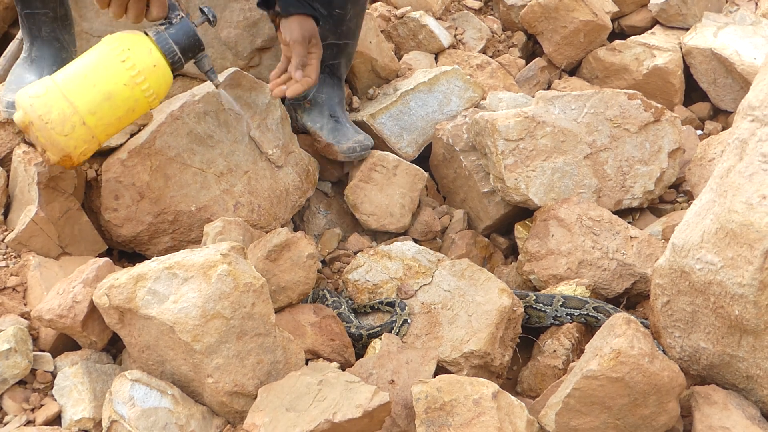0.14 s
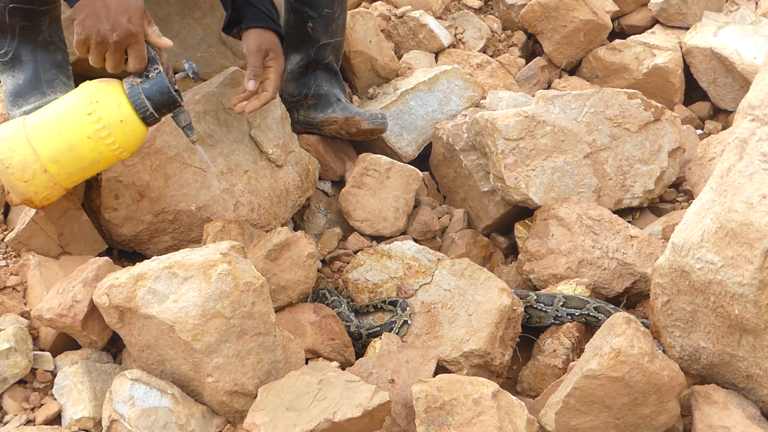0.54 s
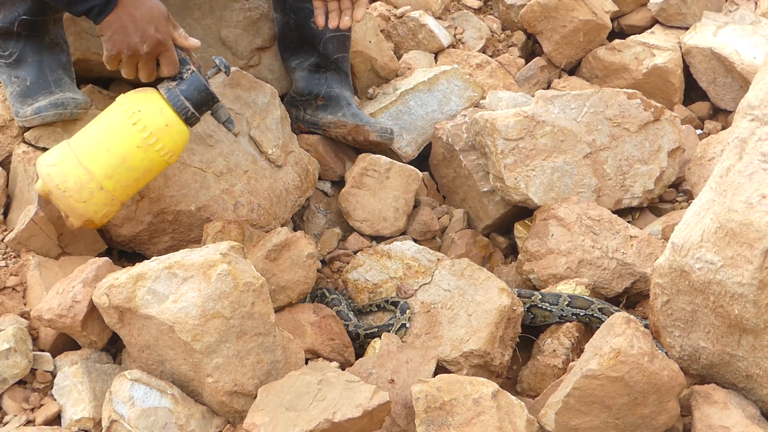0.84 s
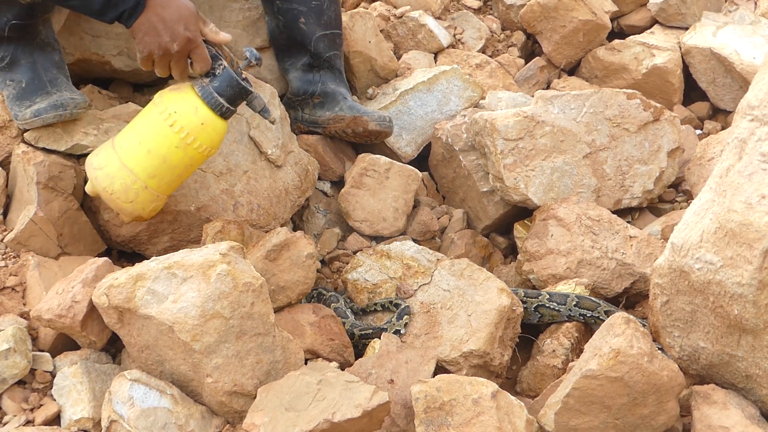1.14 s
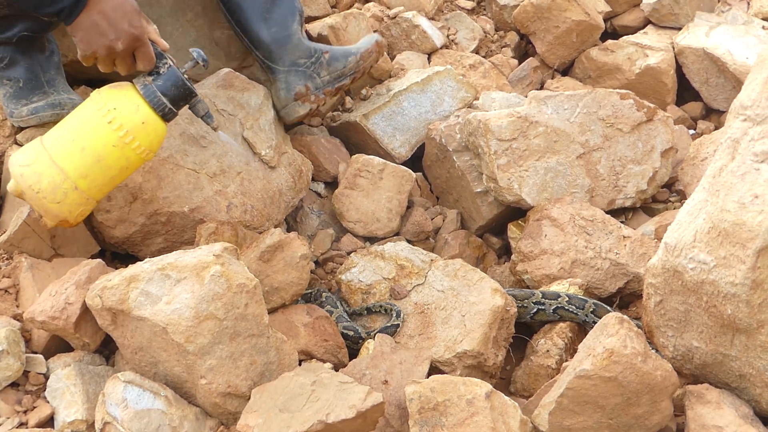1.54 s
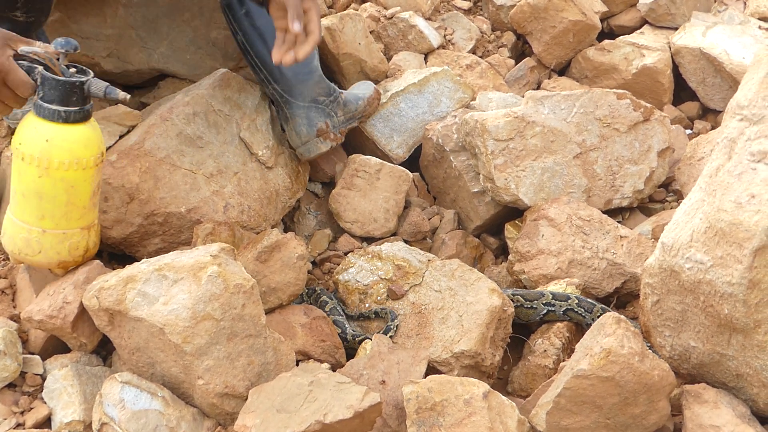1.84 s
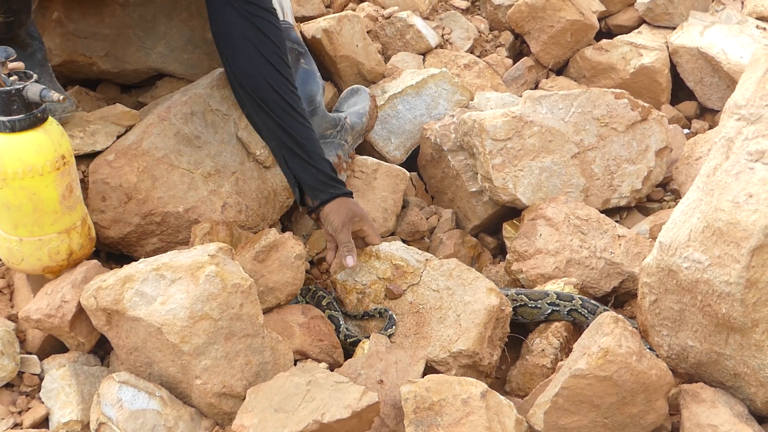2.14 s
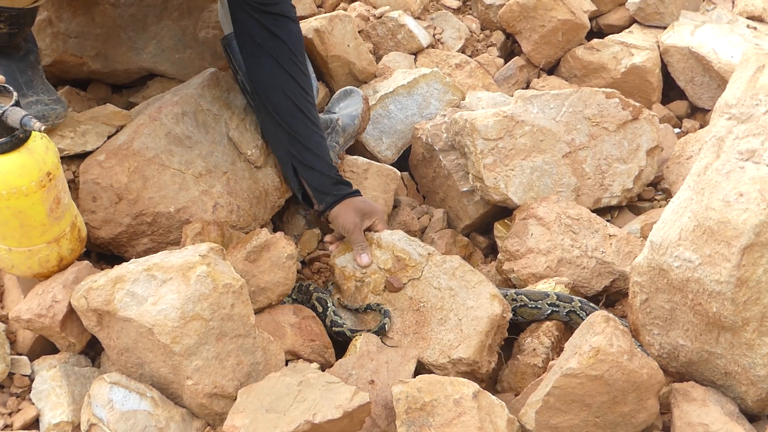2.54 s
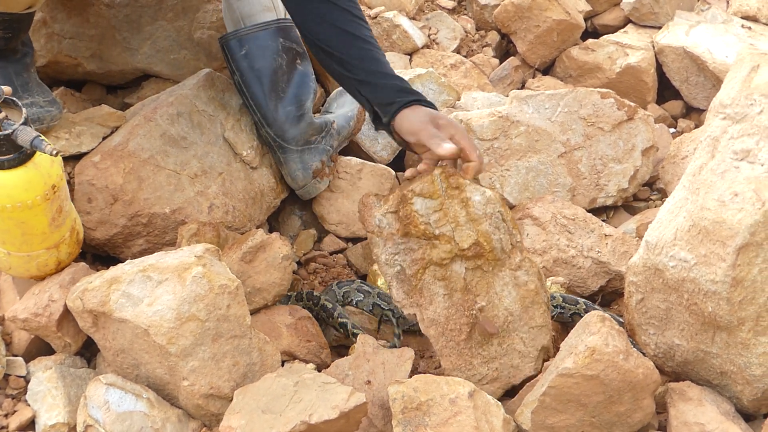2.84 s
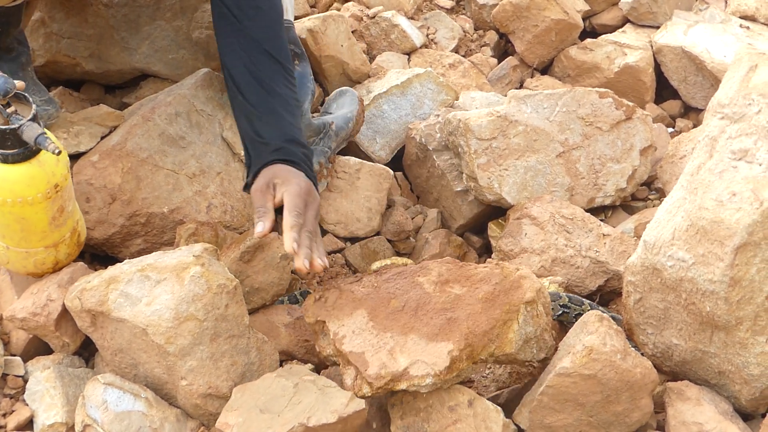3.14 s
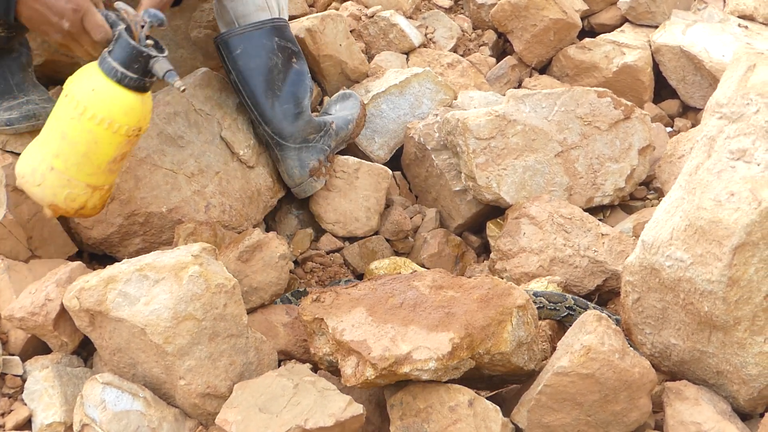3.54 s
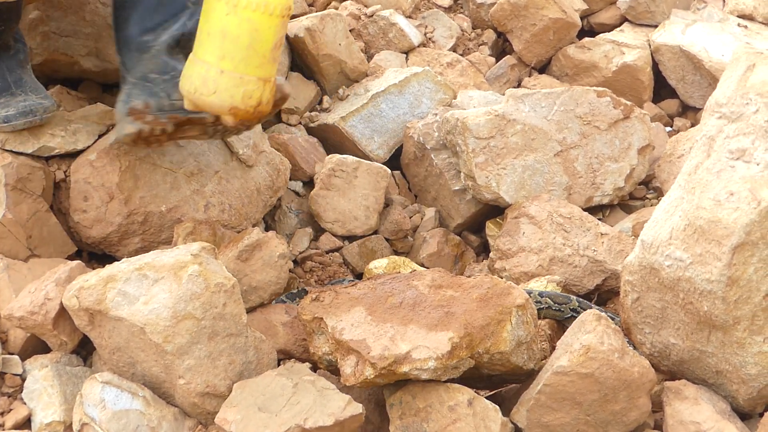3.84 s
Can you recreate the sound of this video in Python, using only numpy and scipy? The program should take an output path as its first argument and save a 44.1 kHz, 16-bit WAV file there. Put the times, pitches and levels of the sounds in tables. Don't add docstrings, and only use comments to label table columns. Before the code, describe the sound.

Loose rocks crunch and tick under rubber boots, with a cluster of hard knocks and a faint squeak, then a large stone tips and lands dully; close outdoor stereo microphone buffeted by wind.

```python
import sys
import numpy as np
from scipy import signal
from scipy.fft import rfft, irfft
from scipy.io import wavfile
from scipy.ndimage import uniform_filter1d

SR = 44100
rng = np.random.default_rng(int(sys.argv[2]) if len(sys.argv) > 2 else 0)


def master_out(mix):
    frames = np.transpose(np.atleast_2d(mix))
    ceiling = np.clip(frames, -1, 1)
    pcm = np.round(ceiling * 32767).astype(np.int16)
    wavfile.write(sys.argv[1], SR, pcm)


def magnitude_from_level(level_db):
    exponent = np.asarray(level_db, float) / 20
    return 10 ** exponent


N = 176400

# time_s, level_db
RUSTLE_SWELL = [(0, 3.5), (.6, 3.5), (1.5, 1), (2.1, 1), (2.4, -1), (2.7, 4), (3.7, 2.5), (4, -2.5)]
# frequency_hz, density_db (per Hz)
RUSTLE_SPECTRUM = [(200, -11.5), (500, -12), (1260, -16), (5800, -23), (7500, -26.5), (12900, -25.5),
                   (15800, -26.5)]
# frequency_hz, likeness (0 to 1)
PORT_LIKENESS = [(200, 0.25), (700, 0.084), (1400, 0.34), (3100, 0.55), (6800, 0.79), (15000, 0.62)]
# time_s, level_db
BREEZE_STRENGTH = [(0, -30), (.6, -34), (.93, -41), (1.0, -51.5), (1.502, -57), (1.568, -35.5), (2.0, -40),
                   (2.08, -60.5), (2.3, -43), (2.86, -32), (2.93, -49.5), (3.5, -43.5), (3.8, -34),
                   (4, -41)]
# frequency_hz, density_db (per Hz)
RUMBLE_SPECTRUM = [(24, -54), (40, -21.5), (107, 4), (185, -1), (324, -10.5), (713, -27), (1500, -41),
                   (1950, -33.5), (3300, -120)]
# start_s, length_s, level_db, pitch_hz
FIRST_GUST_EDDIES = [(0.016, 0.0054, -15.5, 225), (0.068, 0.01, -21, 204), (0.09, 0.019, -29, 227),
                     (0.098, 0.013, -22, 207), (0.135, 0.023, -23.5, 234.5), (0.262, 0.016, -27, 177),
                     (0.292, 0.011, -31.5, 228), (0.388, 0.015, -22, 288), (0.422, 0.025, -26, 204),
                     (0.463, 0.0087, -38, 212), (0.486, 0.0171, -31, 190), (0.563, 0.022, -41.5, 134),
                     (0.593, 0.022, -38, 154), (0.675, 0.016, -29.5, 164), (0.703, 0.013, -32.5, 237)]
# start_s, length_s, level_db,
# pitch_hz
LATER_GUST_EDDIES = [(1.566, 0.014, -38.5, 119), (1.579, 0.0067, -41, 102), (1.737, 0.013, -35.5, 130),
                     (1.76, 0.015, -37.5, 166), (2.408, 0.015, -22.5, 137), (2.512, 0.012, -33, 178),
                     (2.583, 0.014, -31.5, 169), (2.681, 0.021, -39, 140), (2.725, 0.0086, -38.5, 167),
                     (2.76, 0.011, -33.5, 147), (2.795, 0.033, -46.5, 215), (2.838, 0.0084, -26, 165),
                     (2.879, 0.0078, -33, 178), (3.174, 0.0099, -25.5, 228), (3.362, 0.0094, -29, 189),
                     (3.622, 0.0055, -34.5, 164), (3.735, 0.0089, -33.5, 149), (3.78, 0.0077, -22, 144),
                     (3.804, 0.016, -29, 165), (3.851, 0.013, -37, 153), (3.933, 0.0084, -37, 198),
                     (3.96, 0.0086, -33, 171)]
# start_s, length_s, level_db, pitch_hz
SMALL_EDDIES = [(0.804, 0.011, -40, 199), (0.856, 0.0074, -37, 216), (1.258, 0.01, -40.5, 278),
                (1.366, 0.0059, -47, 280), (1.496, 0.0075, -46.5, 287), (1.998, 0.0054, -43.5, 164),
                (2.311, 0.0087, -49, 147), (2.387, 0.0071, -33.5, 138), (3.02, 0.0076, -45.5, 303),
                (3.251, 0.0099, -41, 305), (3.493, .007, -44, 195), (3.609, 0.0058, -42, 200),
                (3.761, .008, -35, 147)]
# start_s, peak_db, pitch_hz
PEBBLE_TICKS = [(0.0138, -24.5, 1140), (.064, -40, 2050), (0.207, -38, 4980), (.236, -31.5, 690),
                (0.397, -43, 3600), (.713, -31, 3640), (0.824, -32.5, 1720), (0.919, -34, 1680),
                (0.96, -40, 5750), (1.0346, -33.5, 3020), (1.0726, -35.5, 850), (1.159, -34, 5130),
                (1.257, -36, 3300), (1.286, -38, 2330), (1.3038, -29, 1840), (1.33, -20.5, 2100),
                (1.384, -27.5, 2270), (1.397, -30, 2100), (1.415, -26, 840), (1.434, -28, 970),
                (1.466, -34.5, 2100), (1.625, -33.5, 1550), (1.684, -24, 776), (1.719, -40, 5030),
                (1.843, -38, 6900), (1.868, -39, 1820), (1.893, -44, 8100), (1.979, -31.5, 1800),
                (2.017, -28, 4900), (2.066, -36, 9000), (2.123, -37, 2900), (2.237, -40.5, 3450),
                (2.349, -38.5, 6700), (2.433, -35, 3400), (1.932, -26, 2820), (2.608, -42.5, 4400),
                (2.717, -21.5, 537), (2.7494, -30.5, 2760), (2.768, -25.5, 11700), (2.838, -34, 13100),
                (2.858, -34.5, 12500), (2.982, -40, 12000), (3.027, -34, 4000), (3.089, -23.5, 550),
                (3.135, -32, 4000), (3.087, -25.5, 4670), (3.246, -40, 2500), (3.302, -29, 920),
                (3.346, -36, 4960), (3.357, -38, 4950), (3.465, -35, 606), (3.468, -37, 3800),
                (3.487, -41, 5300), (3.506, -37, 8700), (3.633, -30.5, 2460), (3.652, -29, 3360),
                (3.6865, -29.5, 3450), (3.722, -37, 3860), (3.862, -41.5, 2690)]
# start_s, peak_db, pitch_hz
SQUEAK_EVENTS = [
    (1.592, -27.5, 1844),
    (1.479, -34, 1850),
    (2.859, -31, 2150),
]
# start_s, peak_db, pitch_hz
STONE_KNOCKS = [
    (0.457, -32.5, 836),
    (1.206, -18.5, 760),
    (1.319, -16.5, 2670),
    (2.77, -29, 4500),
    (2.789, -21, 1090),
    (1.343, -26.5, 2510),
    (3.003, -21, 3750),
    (3.053, -21, 870),
    (3.169, -15, 940),
    (3.211, -24.5, 3200),
]
# frequency_hz, density_db (per Hz)
GRIT_SPECTRUM = [(110, 4), (250, 7), (900, -1.5), (2200, -14.5), (6300, -14), (7500, -15), (14200, -17),
                 (15800, -21)]
# start_s, length_s, level_db, brightest_hz
BOOT_STROKES = [(0.2, 0.2, -46.5, 3640), (0.621, 0.017, -47.5, 4200), (0.705, 0.074, -40.5, 3660),
                (0.811, 0.069, -46.5, 2850), (0.856, 0.037, -46, 3700), (1.087, 0.23, -48.5, 3830),
                (1.216, 0.17, -50, 2360), (1.299, 0.14, -36, 2550), (1.38, 0.052, -41.5, 2380),
                (1.41, 0.043, -40, 1950), (1.618, 0.045, -46.5, 1680), (1.649, 0.05, -47, 1780),
                (1.69, 0.078, -44, 2660), (1.864, 0.055, -40, 3200), (1.906, 0.086, -42.5, 2500),
                (1.988, 0.11, -39.5, 1740)]
# start_s, length_s, level_db, brightest_hz
STONE_STROKES = [(2.603, 0.21, -46.5, 2720), (2.745, 0.085, -41.5, 4600), (3.014, 0.013, -35.5, 3250),
                 (3.048, 0.13, -42.5, 1350), (3.075, 0.018, -39, 2670), (3.108, 0.039, -38.5, 1730),
                 (3.229, 0.03, -38, 2620), (3.296, 0.13, -42.5, 1560), (3.34, 0.032, -42, 2500),
                 (3.484, 0.017, -42, 5650), (3.647, 0.048, -41.5, 3480), (3.681, 0.031, -45.5, 3700)]


def rms_one(x):
    return x / np.sqrt(np.mean(x ** 2) + 1e-20)


def at_hz(points, hz):
    table_hz, value = np.array(points).T
    return np.interp(np.log(hz), np.log(table_hz), value)


def drift(rate_hz):
    pole = np.exp(-40 * np.pi * rate_hz / SR)
    noise = rng.standard_normal(N // 20 + 2002)
    slow = signal.lfilter([1], [1, -2 * pole, pole ** 2], noise)[2000:]
    return np.interp(np.arange(N) / 20, np.arange(len(slow)), rms_one(slow - slow.mean()))


def add(out, start_s, x):
    i = int(start_s * SR)
    x, i = x[..., max(-i, 0):], max(i, 0)
    out[..., i:i + x.shape[-1]] += x[..., :out.shape[-1] - i]


def pan(db):
    return magnitude_from_level([[db / 2], [-db / 2]])


def coloured(source, spectrum, flicker_db, rate_hz):
    hz = np.maximum(np.fft.rfftfreq(N, 1 / SR), 10)
    alike = np.clip(at_hz(PORT_LIKENESS, hz), 0, 1)
    mid, side = rfft(source) * magnitude_from_level(at_hz(spectrum, hz)) * [np.sqrt(1 + alike), np.sqrt(1 - alike)]
    out, together = 0, drift(rate_hz)
    for centre_hz in 40 * 2. ** np.arange(10):
        share = np.cos(np.clip(np.log2(hz / centre_hz), -1, 1) * np.pi / 2) ** 2
        gain = magnitude_from_level(flicker_db * (0.85 * together + 0.48 * drift(rate_hz * 2)))
        out = out + gain * irfft([(mid + side) * share, (mid - side) * share], N)
    return rms_one(out)


def rustling_air(ground):
    trickle_s, trickle_db, air_db = 0.096, -10, -52
    power = np.mean(ground ** 2, 0)
    for _ in range(2):
        power = uniform_filter1d(power, int(trickle_s * SR))
    busy = np.sqrt(np.abs(power))
    swell_db = np.interp(np.arange(N) / SR, *np.transpose(RUSTLE_SWELL))
    spectrum = [(60, -47)] + RUSTLE_SPECTRUM
    air = coloured(rng.standard_normal((2, N)), spectrum, flicker_db=2.5, rate_hz=70)
    return air * (magnitude_from_level(air_db + swell_db) + magnitude_from_level(trickle_db) * busy) + magnitude_from_level(-62.5) * pebbles()


def rumble():
    time_s, level_db = np.transpose(BREEZE_STRENGTH)
    spectrum = [(35, -62)] + RUMBLE_SPECTRUM[1:] + [(4000, -81)]
    source = rng.standard_normal((2, N)) * [[1], [.5]]
    noise = coloured(source, spectrum, flicker_db=6, rate_hz=14)
    return noise * magnitude_from_level(np.interp(np.arange(N) / SR, time_s, level_db))


def eddies():
    stretch, glide, lift_db = 0.5775, 0.338, 9
    froth_db, across_db, froth_db_per_octave = -1.5, 0, -11
    first_gust_s, first_gust_across_db = .75, 5
    out = np.zeros((2, N))
    rows = FIRST_GUST_EDDIES + LATER_GUST_EDDIES + SMALL_EDDIES
    chances = rng.uniform(-0.921, 1, (len(rows), 8, 6))
    for (start_s, length_s, level_db, pitch_hz), chance in zip(rows, chances):
        half = length_s * stretch
        t = np.arange(-3 * half, 3 * half, 1 / SR)
        glided = t + glide * chance[0, 4] * t ** 2 / half
        core = np.exp(-(t / half) ** 2) * np.cos(2 * np.pi * pitch_hz * glided + np.pi * chance[1, 4])
        octaves = np.linspace(.3, 1.9, 8)[:, None] + 0.25 * chance[:, :1]
        at = t - half * 1.019 * chance[:, 1:2]
        swirl = magnitude_from_level(froth_db_per_octave * octaves) * np.exp(-(at / half * (1.16 + 1.14 * octaves)) ** 2)
        phase = 2 * np.pi * pitch_hz * 2 ** octaves * at + np.pi * chance[:, 2:3]
        mid = core + magnitude_from_level(froth_db) * np.sum(swirl * np.cos(phase), 0)
        opposed = np.sum(octaves * swirl * np.sin(phase + 1.1 * chance[:, 3:4]), 0)
        late_core = 0.5 * chance[2, 4] * np.roll(core, 40)
        side_db = across_db + first_gust_across_db * (start_s < first_gust_s)
        side = magnitude_from_level(side_db) * (opposed + late_core)
        add(out, start_s + t[0], magnitude_from_level(level_db + lift_db) * pan(3.87) * [mid + side, mid - side])
    return out


def pebbles():
    clicks_per_s, cycles = 1500, 50
    born = rng.random(N) < clicks_per_s * magnitude_from_level(6 * drift(40)) / SR
    clicks = born * magnitude_from_level(1.4 * np.minimum(rng.exponential(1, N), 4))
    dealt, out = rng.integers(0, 24, N), 0
    for k, hz in enumerate(np.geomspace(450, 7000, 24)):
        r, w = magnitude_from_level(-60 * hz / (cycles * SR)), 2 * np.pi * hz / SR
        struck = clicks * (dealt == k) + 1e-18
        ringing = signal.lfilter([0, np.sin(w)], [1, -2 * r * np.cos(w), r * r], struck)
        out = out + magnitude_from_level(at_hz(GRIT_SPECTRUM, hz)) * hz * ringing
    return rms_one(out)


def ticks():
    attack_s, t60_s, damping = 0.001972, 0.044, 0.17
    snap_octaves, ring_db, side_db = 0.76, 2.5, -13
    out, t = np.zeros((2, N)), np.arange(int(.06 * SR)) / SR
    noises = rng.normal(0, 1, (len(PEBBLE_TICKS), 2, len(t)))
    for (start_s, peak_db, pitch_hz), noise in zip(PEBBLE_TICKS, noises):
        dying = magnitude_from_level(-60 * t / t60_s * (pitch_hz / 1000) ** damping)
        dying = dying * np.minimum(t / attack_s, 1) ** 2
        edges_hz = np.minimum(pitch_hz * 2 ** (snap_octaves * np.array([-1, 1])), SR / 2.5)
        snap = rms_one(signal.lfilter(*signal.butter(2, edges_hz, "band", fs=SR), noise))
        ring = rms_one(signal.lfilter(*signal.iirpeak(pitch_hz, 9, fs=SR), noise))
        mid, side = dying * (snap + magnitude_from_level(ring_db) * ring) * magnitude_from_level([[0], [side_db]])
        tick = np.array([mid + side, mid - side])
        add(out, start_s - attack_s / 2, magnitude_from_level(peak_db) / np.abs(mid).max() * tick)
    return out


def squeaks():
    rise_s, sag_per_s = 0.0098, 2.96
    out, t = np.zeros(N), np.arange(int(.08 * SR)) / SR
    for start_s, peak_db, pitch_hz in SQUEAK_EVENTS:
        rough = 1 + 0.5 * rms_one(uniform_filter1d(rng.standard_normal(len(t)), 40))
        shape = t / rise_s * np.exp(1 - 2 * t / rise_s)
        tone = np.sin(2 * np.pi * pitch_hz * t * (1 - sag_per_s * t))
        add(out, start_s, magnitude_from_level(peak_db) * rough * shape * tone)
    return out


def knocks():
    t60_s, damping, width = 0.056, .6, 1.3
    out, t = np.zeros(N), np.arange(int(.08 * SR)) / SR
    noises = rng.normal(0, 1, (len(STONE_KNOCKS), len(t)))
    for (start_s, peak_db, pitch_hz), noise in zip(STONE_KNOCKS, noises):
        dying = magnitude_from_level(-60 * t / t60_s * (pitch_hz / 1000) ** damping) * np.minimum(t / 0.002, 1)
        dull = signal.lfilter(*signal.butter(2, 1.73 * pitch_hz, fs=SR), noise)
        body = dying * signal.lfilter(*signal.iirpeak(pitch_hz, 1 / width, fs=SR), dull)
        add(out, start_s, magnitude_from_level(peak_db) * body / np.abs(body).max())
    return out


def crunching_grit():
    grains_per_s, grain_spread_db, grain_share = 1800, -1, 0.64
    sizes = magnitude_from_level(grain_spread_db * np.minimum(rng.exponential(1, N), 5))
    clicks = sizes * (rng.random(N) < grains_per_s / SR)
    grains = rms_one(clicks) * rng.standard_normal((2, N))
    source = grain_share * grains + (1 - grain_share) * rng.standard_normal((2, N))
    grit = coloured(source * [[1], [.6]], GRIT_SPECTRUM, flicker_db=0.7, rate_hz=13)
    return grit + magnitude_from_level(-5) * pebbles()


def scrapes():
    attack_s, release_s, peak_db, peak_width = 0.012, 0.031, -4, .25
    grit, out = crunching_grit(), np.zeros((2, N))
    for start_s, length_s, level_db, brightest_hz in BOOT_STROKES + STONE_STROKES:
        t = np.arange(int((length_s + 6 * release_s) * SR)) / SR
        release = np.exp(-np.maximum(t - 0.42 * length_s, 0) / release_s * 2)
        shape = np.minimum(t / attack_s, 1) * release
        piece = grit[:, int(start_s * SR):][:, :len(t)]
        b, a = signal.iirpeak(brightest_hz, 1 / peak_width, fs=SR)
        piece = piece + magnitude_from_level(peak_db) * rms_one(signal.lfilter(b, a, piece))
        add(out, start_s, piece * shape[:piece.shape[1]] * magnitude_from_level(level_db))
    return out


def scene():
    ground = scrapes()
    around = rustling_air(ground) + squeaks() + knocks() + ground
    return rumble() + eddies() + ticks() + around * pan(1.2)


def band_limit(x):
    return signal.sosfilt(signal.butter(12, 15950, fs=SR, output="sos"), x)


def record(dry):
    x = signal.sosfilt(signal.butter(3, 60, "high", fs=SR, output="sos"), dry)
    x = signal.lfilter(*signal.iirnotch(7500, 70, fs=SR), x)
    rounded = 0.93 * np.tanh(x / 1.022)
    x = signal.sosfilt(signal.cheby2(12, 70, 16300, fs=SR, output="sos"), rounded)
    return band_limit(x)


dry = scene()
out = record(dry)
master_out(out)
```